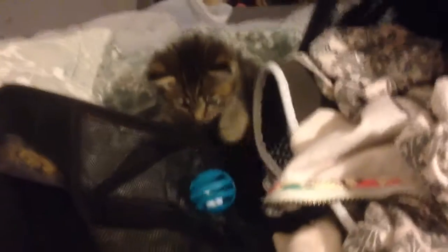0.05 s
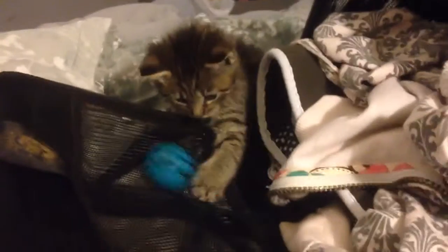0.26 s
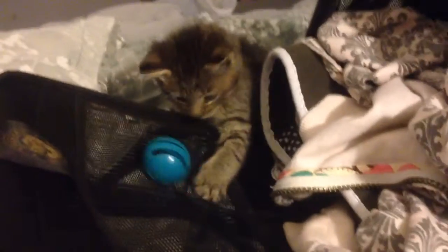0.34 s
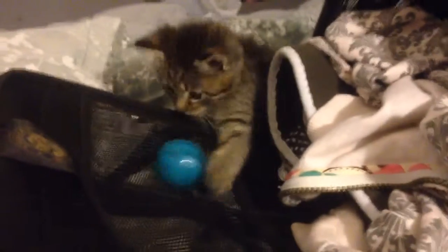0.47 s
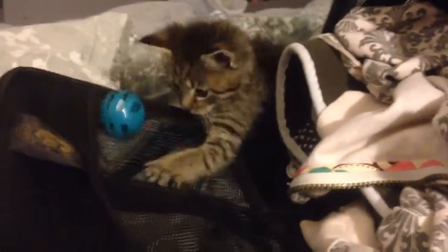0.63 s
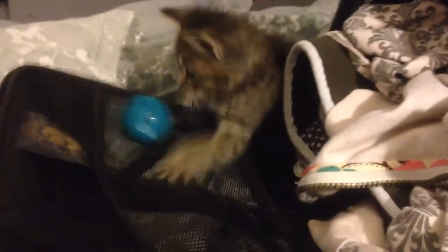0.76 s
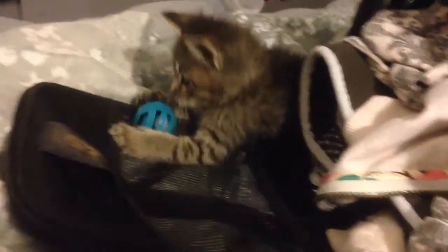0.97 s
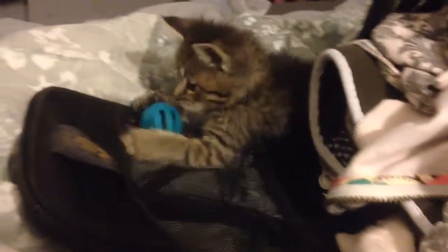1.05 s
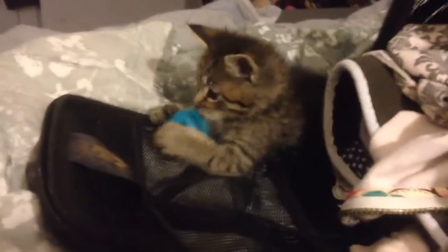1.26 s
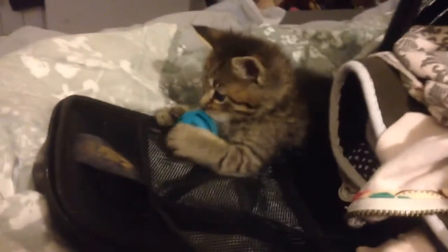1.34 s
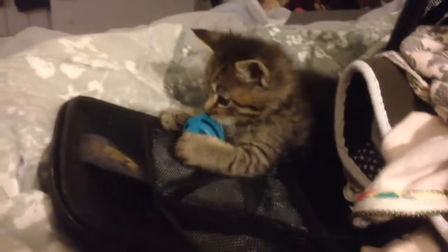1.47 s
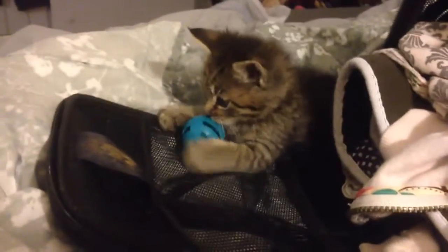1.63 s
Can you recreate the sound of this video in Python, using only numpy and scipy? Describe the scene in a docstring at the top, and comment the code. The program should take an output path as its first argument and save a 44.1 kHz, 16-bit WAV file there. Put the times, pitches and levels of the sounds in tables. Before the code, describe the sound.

A tiny bell in a slotted plastic ball jingles and rattles brightly as a kitten bats it over a fabric bag, then settles to a few faint ticks in a quiet, cloth-filled room, heard close.

```python
"""Kitten with a bell ball

A kitten bats a slotted plastic ball with a small bell inside across a fabric bag in a quiet room.
A pellet strikes the bell, whose two close tones beat and die fast; the bell knocks on the plastic shell.
The rolling ball chatters, ticks and rustles as shaped noise and clicks, and paws thud softly on the bag.
A thin whine passes early on, over a low rumble, a wavering hum, a soft wash and a faint hiss."""
import sys
import numpy as np
from scipy import signal
from scipy.io import wavfile
from scipy.ndimage import uniform_filter1d

SR = 44100
rng = np.random.default_rng(int(sys.argv[2]) if len(sys.argv) > 2 else 0)


def dump_mix(stems):
    """Bounce the given channels to the path in sys.argv[1] as a 16-bit WAV at rate SR."""
    frames = np.atleast_2d(stems).T  # one column per channel
    limited = np.clip(frames, -1, 1)  # hard clip at full scale
    pcm = np.round(limited * 32767).astype(np.int16)
    wavfile.write(sys.argv[1], SR, pcm)


N = 74970

# how hard the ball is rolled and rubbed, before each layer's own gain: t/s, level/dB
ROLL_LEVEL = [(.17, -104), (.205, -68), (.28, -62), (.36, -80.5), (.44, -88), (.48, -63), (.53, -68.5),
              (.575, -62), (.615, -69), (.65, -67), (.77, -76.5), (.84, -67.5), (.94, -58.5), (1.02, -67.5),
              (1.12, -72), (1.4, -79), (1.48, -97)]
# tone colour of the pellet's tick on metal: f/Hz, level/dB
METAL_TICK = [(1000, -34.5), (4200, -18), (5300, -7), (7200, 0.5), (9200, 6.5), (10700, -14.5),
              (15000, -22)]
# tone colour of the bright crack on plastic: f/Hz, level/dB
PLASTIC_CRACK = [(900, -17.5), (4100, -13), (5600, -4.5), (7500, -2.5), (8800, -0.5), (15000, -24.5)]


def amp(db):
    """Turns decibels into a gain to multiply by."""
    return 10 ** (np.asarray(db) / 20)


def unit(x):
    """Scales a sound to an average strength (rms) of 1."""
    return x / np.sqrt(np.mean(x ** 2) + 1e-20)


def unit_peak(x):
    """Scales a sound so that its loudest millisecond has rms 1."""
    power = uniform_filter1d(x ** 2, size=44, mode="constant")
    return x / np.sqrt(power.max() + 1e-20)


def fade(t, t60):
    """Dies away exponentially, by 60 dB in t60 seconds."""
    return np.exp(-np.log(1000) * t / t60)


def level(points):
    """Joins points of (s, dB) into a gain for every sample."""
    return amp(np.interp(np.arange(N) / SR, *np.transpose(points)))


def add(mix, s, sound):
    """Mixes a sound in, starting at time s."""
    part = mix[max(round(s * SR), 0):][:len(sound)]
    part += sound[:len(part)]


def colour(x, points, size=4096):
    """Filters a sound to the tone colour (Hz, dB), without any sound before its start."""
    hz, db = np.transpose(points)
    log_f = np.log(abs(np.fft.fftfreq(size, 1 / SR)) + 1)
    log_gain = np.log(amp(np.interp(log_f, np.log(hz), db)))
    # this phase packs the filter's energy as early as possible
    spectrum = np.exp(np.conj(signal.hilbert(log_gain)))
    taps = np.fft.ifft(spectrum).real[:size // 2]
    return signal.fftconvolve(x, taps)[:len(x)]


def noise(points):
    """Makes noise of the given tone colour, with rms 1."""
    return unit(colour(rng.standard_normal(N), points))


def clicks(per_s, spread_db):
    """Scatters clicks of uneven size and sign at random, per_s a second on average."""
    size = amp(spread_db * np.minimum(rng.exponential(1, N), 3))
    sign = rng.choice([-1, 1], N)
    return size * sign * (rng.random(N) < per_s / SR)


def wander(per_s):
    """Drifts in straight lines between random values, per_s new ones a second."""
    t = np.arange(N) / SR
    knots = np.arange(0, t[-1] + 1, 1 / per_s)
    return np.interp(t, knots, rng.standard_normal(len(knots)))


def bell():
    """The pellet strikes the bell clearly, and skitters inside it while the ball rolls."""
    # pellet strikes: t/s, ring level/dB, upper tone relative to lower/dB, contact tick level/dB
    strikes = [(0.0723, -65.5, -20, -66), (0.211, -52, -12, -55), (0.2398, -35, -30, -40.5),
               (0.2882, -51.5, -21, -52.5), (0.335, -60, -24, -51), (0.3956, -49.5, -12, -48.5),
               (0.4241, -40, -23, -37.5), (0.4438, -38.5, -13.5, -47), (0.4579, -38, -15, -41.5),
               (0.468, -36.5, -26, -54), (0.4864, -42, -3, -45.5), (0.494, -41.5, -19, -44),
               (0.5418, -45, -11, -46), (0.558, -22, 6.5, -36), (0.569, -55, -15.5, -49.5),
               (0.5807, -39, 7, -43.5), (0.5835, -44, -6.5, -41.5), (0.5899, -32.5, -16.5, -43.5),
               (0.6262, -30.5, -10, -38.5), (0.6471, -38.5, -18.5, -43.5), (0.6772, -33, -29, -56),
               (0.6996, -31.5, -9, -51), (0.716, -24.5, 8, -41.5), (0.7253, -35, -13, -57),
               (0.73, -26, -13, -35), (0.7425, -31.5, -25, -46.5), (0.761, -49, -14, -48),
               (0.8049, -38.5, -20, -48), (0.8288, -43, 6, -49), (0.8351, -38.5, -7, -48),
               (0.8416, -42, -3, -43), (0.856, -50, -12, -42), (0.8653, -33, 12, -47),
               (0.8766, -42.5, 7, -52), (0.9089, -28, -26, -41), (0.921, -35.5, -1, -41),
               (0.939, -33, -35, -50), (0.948, -38, 16, -66), (0.9745, -45, -4.5, -48),
               (0.987, -34.5, -32, -41), (1.0018, -37, 11, -46.5), (1.0257, -39.5, 4, -49),
               (1.0371, -47.5, 1, -44), (1.0477, -45, -3, -49), (1.2396, -63, -22.5, -50),
               (1.2815, -40, -36, -47), (1.37, -48.5, -19, -49.5), (1.395, -57.5, -17, -58),
               (1.4055, -56.5, -14, -68)]
    chatters_per_s, chatter_spread_db, chatter_db = 260, 3, 1.5
    out = np.zeros(N)
    for s, ring_db, upper_db, tick_db in strikes:
        add(out, s, amp(ring_db) * ring(upper_db))
        add(out, s, amp(tick_db) * contact(METAL_TICK))
    hits = clicks(chatters_per_s, chatter_spread_db)
    chatter = signal.fftconvolve(hits, ring(upper_db=-2.5))[:N]
    return out + amp(chatter_db) * level(ROLL_LEVEL) * unit(chatter)


def ring(upper_db):
    """The bell's two close tones swell and beat as they die, with a weaker one that varies each time."""
    low_hz, low_t60_s = 9626, 0.033
    high_hz, high_t60_s = 9744, 0.031
    detune_hz = 12  # typical random shift of each of the two tones
    linger_db, linger_t60_s = -27, .16  # faint ring that outlasts the contact
    side_hz, side_db, side_t60_s = 8950, -22, .024
    side_spread = .04  # typical random shift, as a fraction of the pitch
    rise_s = 0.00073
    t = np.arange(SR // 5) / SR
    low_hz, high_hz = np.array([low_hz, high_hz]) + detune_hz * rng.standard_normal(2)
    linger = amp(linger_db) * fade(t, linger_t60_s)
    low = np.sin(2 * np.pi * low_hz * t) * (fade(t, low_t60_s) + linger)
    high = -np.cos(2 * np.pi * high_hz * t) * (fade(t, high_t60_s) + linger)
    side_hz *= 1 + side_spread * rng.standard_normal()
    side = amp(side_db) * fade(t, side_t60_s) * np.sin(2 * np.pi * side_hz * t)
    rise = 1 - np.exp(-(t / rise_s) ** 2)
    return unit_peak((low + amp(upper_db) * high + side) * rise)


def contact(spectrum):
    """A hard contact: a sharp tick of noise, with a weaker, longer scatter inside the ball."""
    tick_t60_s = .003
    scatter_db, scatter_t60_s = -15.5, 0.018
    t = np.arange(SR // 20) / SR
    strength = fade(t, tick_t60_s) + amp(scatter_db) * fade(t, scatter_t60_s)
    burst = rng.standard_normal(len(t)) * strength
    return unit_peak(colour(burst, spectrum))


def shell():
    """Each knock cracks, skids and briefly rings the plastic at the pitch of the spot that is hit."""
    # knocks on the ball's shell: t/s, hollow body level/dB, body pitch f/Hz, bright crack level/dB
    knocks = [(0.2365, -66, 2500, -50), (0.3257, -59.5, 2810, -54.5), (0.4241, -45.5, 5250, -49),
              (0.467, -49.5, 2600, -51.5), (0.494, -45.5, 3220, -50.5), (0.5447, -50.5, 3700, -48),
              (0.5694, -43.5, 2780, -35), (0.647, -48, 2590, -46), (0.678, -51.5, 2800, -62),
              (0.7149, -52, 2800, -43), (0.8128, -55, 2530, -55), (0.8816, -50, 1670, -50),
              (0.909, -44.5, 3390, -31), (0.923, -51, 2060, -39), (0.9419, -47, 1574, -62),
              (0.9475, -43, 2690, -44), (0.9714, -38.5, 2420, -39.5), (1.027, -50, 2280, -47),
              (1.0743, -51, 2530, -52), (1.239, -54.5, 2760, -56)]
    # tones of the plastic shell: ratio to the knock's pitch, level/dB, time to fade by 60 dB/s
    shell_tones = [(.66, -8, 0.0049), (1, -2.5, 0.0072), (1.2, -4, 0.0042), (1.6, -7, 0.0033)]
    scrape_db, scrape_t60_s = -26.5, 0.031  # the shell skids on after a knock
    out = np.zeros(N)
    t = np.arange(SR // 20) / SR
    for s, body_db, hz, crack_db in knocks:
        tones = np.zeros(len(t))
        for k, (ratio, db, t60) in enumerate(shell_tones):
            sign = (-1) ** k
            tones += sign * amp(db) * fade(t, t60) * np.sin(2 * np.pi * hz * ratio * t)
        scrape = amp(scrape_db) * fade(t, scrape_t60_s) * rng.standard_normal(len(t))
        push = (t == 0) + scrape  # one sharp hit plus the skid
        body = signal.fftconvolve(push, tones)[:len(t)]
        add(out, s, amp(body_db) * unit_peak(body) + amp(crack_db) * contact(PLASTIC_CRACK))
    return out


def grit(rolling, count=3):
    """The bell slides round the inside of the ball in tiny ticks on metal and plastic."""
    grit_per_s, grit_spread_db, grit_db = 380, 3.5, -2
    ticks = np.zeros(N)
    # several versions of each tick share the total rate
    for spectrum in [METAL_TICK, PLASTIC_CRACK] * count:
        hits = clicks(grit_per_s / (2 * count), grit_spread_db)
        ticks += signal.fftconvolve(hits, contact(spectrum))[:N]
    return amp(grit_db) * rolling * unit(ticks)


def fabric(rolling):
    """Ball and paws rub the bag: a soft rustle of noise with fine crackles."""
    # tone colour of the fabric rustle: f/Hz, level/dB
    rustle_colour = [(80, -17), (700, 3), (1500, 2), (2700, 3), (4300, -5), (8500, -3.5), (11500, -15),
                     (15500, -5.5)]
    rustle_db, crackle_db = 3, 0
    crackles_per_s, crackle_spread_db = 1500, 4.5
    crackle = unit(colour(clicks(crackles_per_s, crackle_spread_db), rustle_colour))
    return rolling * (amp(rustle_db) * noise(rustle_colour) + amp(crackle_db) * crackle)


def paws(swell_s=0.0051):
    """Each soft paw thud is a low tone of a few cycles that swells and dies."""
    # paw thuds on the bag: t/s, level/dB, pitch f/Hz
    thuds = [(.004, -50, 131), (0.081, -62.5, 104), (0.923, -56.5, 111), (1.405, -52, 119)]
    out = np.zeros(N)
    t = np.arange(SR // 10) / SR
    for s, db, hz in thuds:
        thud = t * np.exp(-t / swell_s) * np.sin(2 * np.pi * hz * t)
        add(out, s, amp(db) * unit_peak(thud))
    return out


def whine():
    """A faint, thin tone swells, rises a little in pitch and fades."""
    start_s, length_s = .11, .14
    first_hz, last_hz, peak_db = 3250, 3330, -74
    out = np.zeros(N)
    u = np.linspace(0, 1, round(length_s * SR))  # 0 at its start, 1 at its end
    hz = first_hz + (last_hz - first_hz) * u
    tone = np.sin(2 * np.pi * np.cumsum(hz) / SR)
    add(out, start_s, amp(peak_db) * np.sin(np.pi * u) * tone)
    return out


def room(x):
    """Adds the short, faint tail of a room full of cloth, as fading noise."""
    tail_db, tail_t60_s, tail_rise_s = -19, .2, 0.023
    t = np.arange(SR // 3) / SR
    tail = rng.standard_normal(len(t)) * fade(t, tail_t60_s) * np.minimum(t / tail_rise_s, 1)
    return x + amp(tail_db) * signal.fftconvolve(x, tail / np.linalg.norm(tail))[:N]


def background():
    """Low rumble, soft wash and steady hiss are shaped noise; the hum is a tone of wavering strength."""
    # tone colour of the low room rumble: f/Hz, level/dB
    rumble_colour = [(25, -59), (75, -24.5), (110, -10.5), (160, -4.5), (200, 0), (250, -4), (310, -2),
                     (400, -19.5), (600, -26.5), (1500, -47)]
    # how loud the rumble is: t/s, level/dB
    rumble_level = [(0, -59.5), (.33, -60), (.5, -63), (1.7, -64.5)]
    # tone colour of the room wash: f/Hz, level/dB
    wash_colour = [(60, -13), (400, 4), (900, 6.5), (1400, 5.5), (2200, -4), (4000, -16.5), (15500, -40.5)]
    # how loud the wash is: t/s, level/dB
    wash_level = [(0, -62), (.4, -65.5), (1.1, -65), (1.4, -68.5), (1.7, -67.5)]
    # tone colour of the hiss: f/Hz, level/dB
    hiss_colour = [(7000, 1.5), (10000, -4.5)]
    hiss_db = -75
    hum_hz, hum_db = 237.2, -2  # level relative to the rumble
    hum_waver = .3  # typical change in strength, as a fraction
    t = np.arange(N) / SR
    strength = 1 + hum_waver * wander(per_s=14)
    hum = unit(strength * np.sin(2 * np.pi * hum_hz * t))
    low = level(rumble_level) * (noise(rumble_colour) + amp(hum_db) * hum)
    wash = level(wash_level) * noise(wash_colour)
    return low + wash + amp(hiss_db) * noise(hiss_colour)


def scene():
    """The toy and the kitten in the room; the ball rolls in small jerks."""
    clump_db, clumps_per_s = 2.5, 90  # the ball catches and slips
    jerks = unit(amp(clump_db * wander(clumps_per_s)))
    rolling = level(ROLL_LEVEL) * jerks
    toy = bell() + shell() + grit(rolling) + fabric(rolling)
    return (room(toy) + paws() + whine() + background())[None]


def record(dry):
    """The recorder's band limit: a steep filter removes the highest treble."""
    edge_hz = 15450
    taps = signal.firwin(511, edge_hz, window=("kaiser", 8), fs=SR)
    return signal.oaconvolve(dry, taps[None], "same")


dry = scene()
out = record(dry)
dump_mix(out)
```